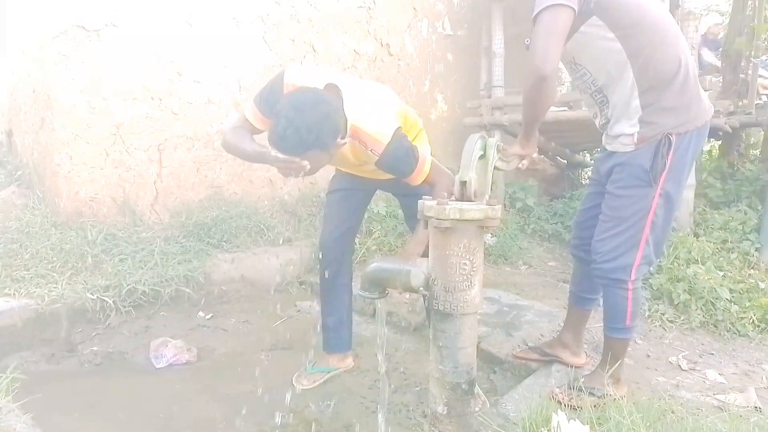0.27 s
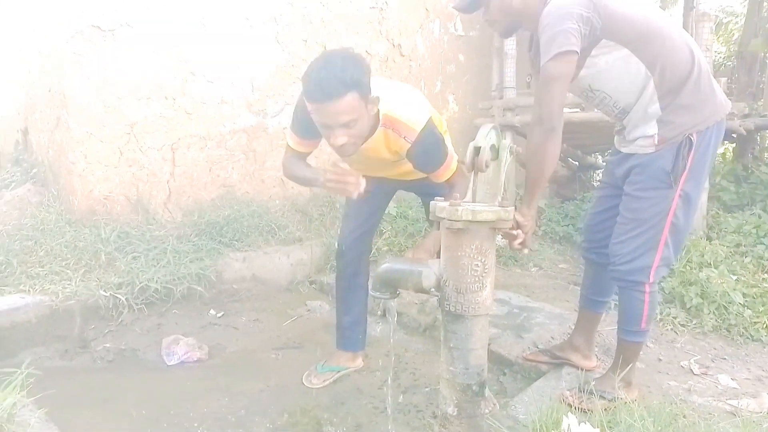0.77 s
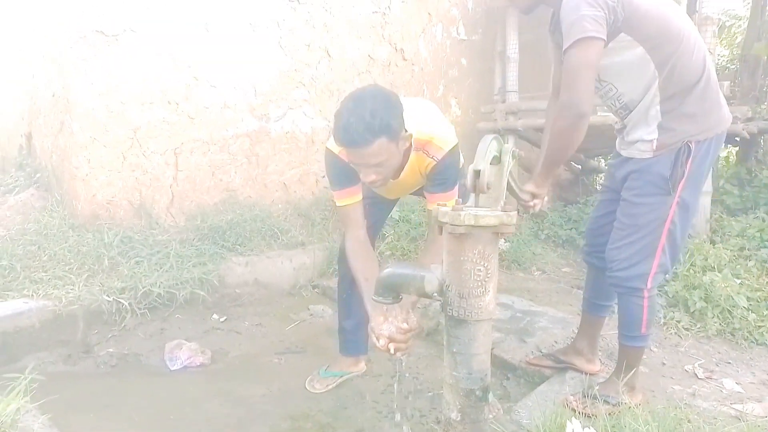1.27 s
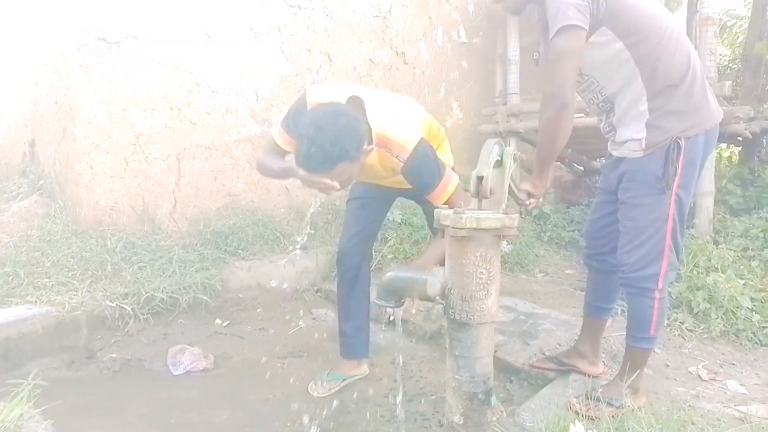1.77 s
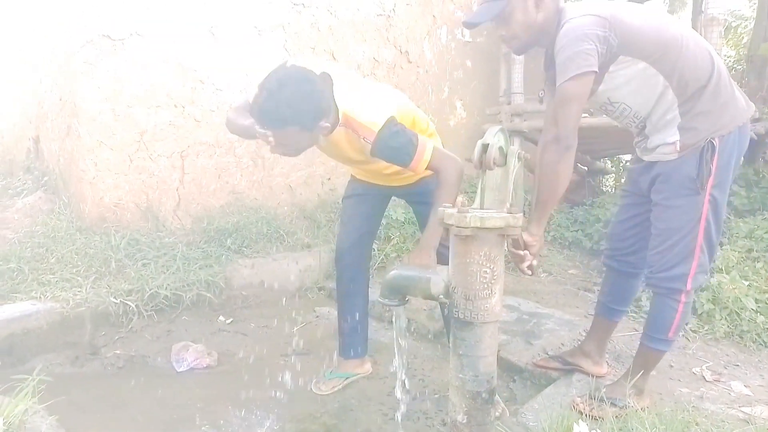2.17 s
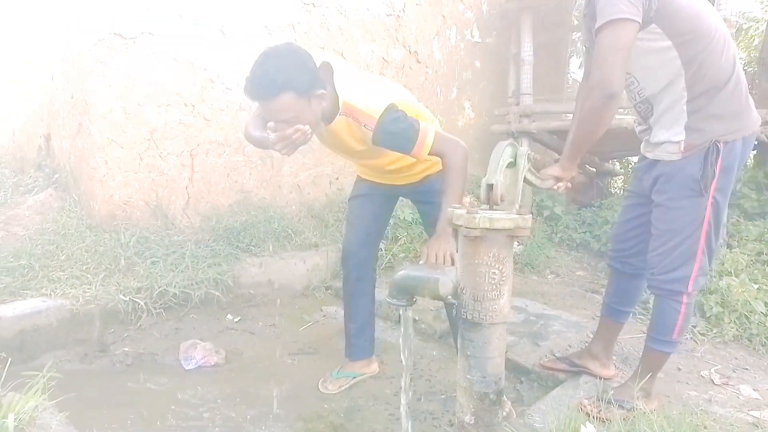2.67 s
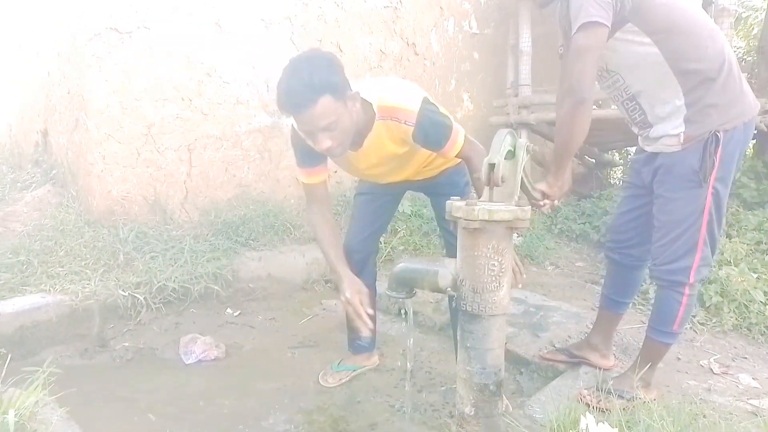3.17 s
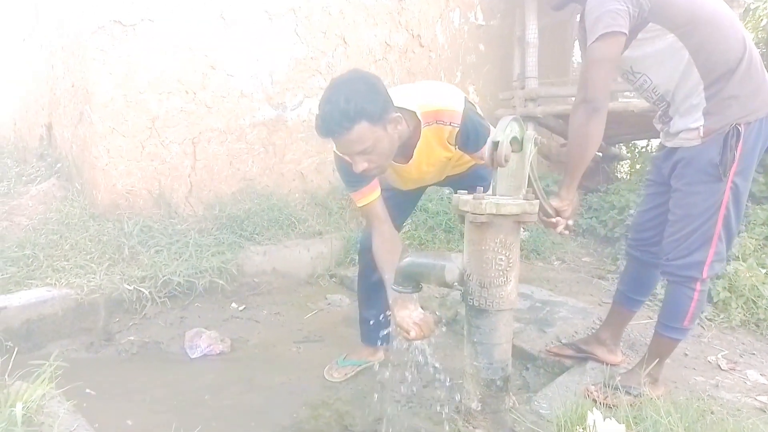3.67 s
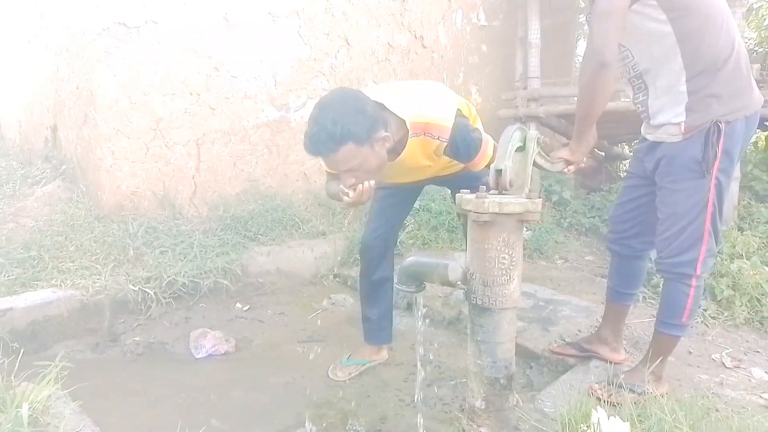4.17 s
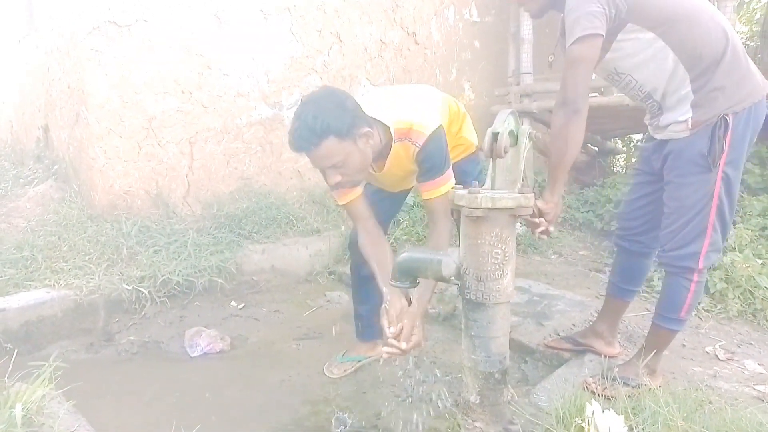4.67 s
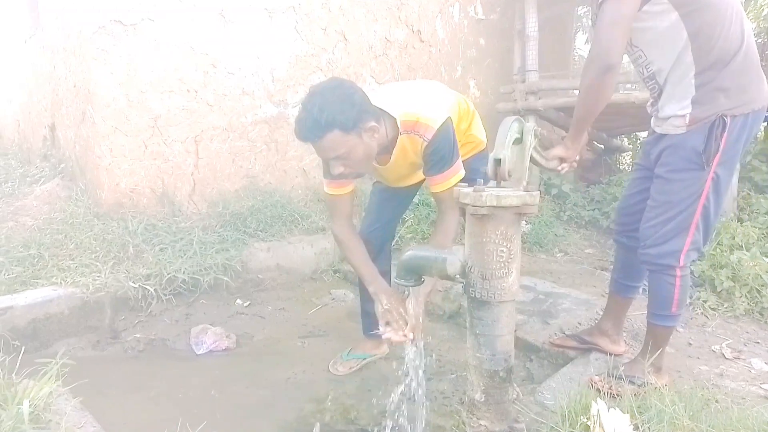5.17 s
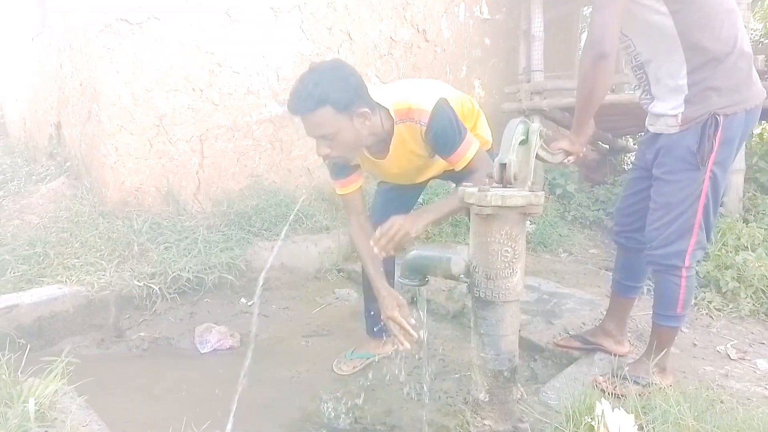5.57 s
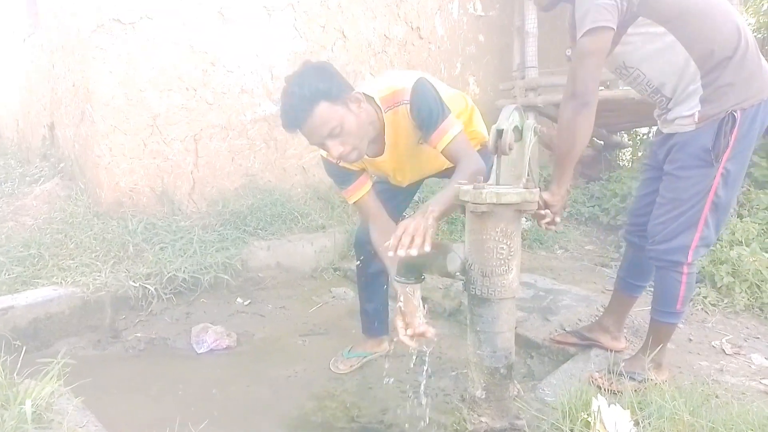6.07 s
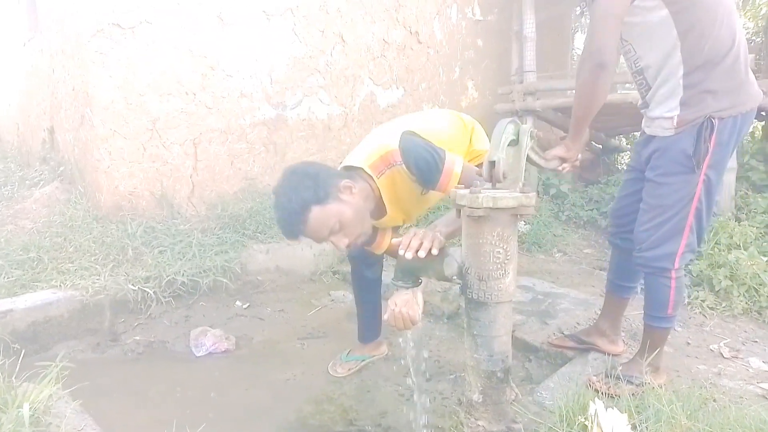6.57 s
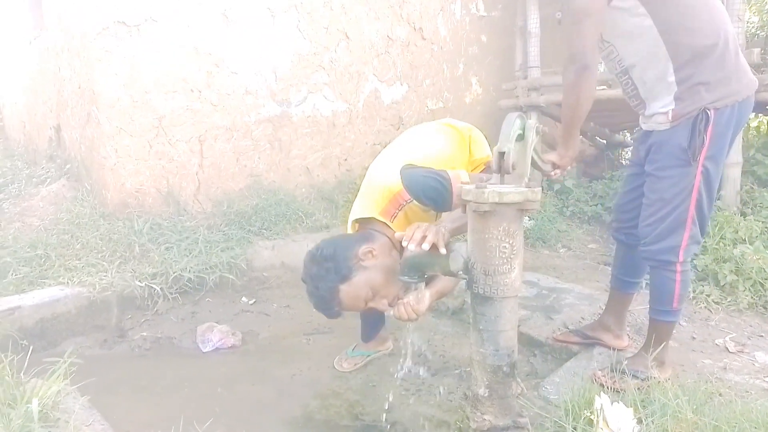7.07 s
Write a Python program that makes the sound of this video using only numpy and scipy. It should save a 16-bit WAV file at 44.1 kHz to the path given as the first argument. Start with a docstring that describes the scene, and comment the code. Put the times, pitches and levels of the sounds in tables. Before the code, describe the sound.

A quiet outdoor yard, heard close in stereo. Water hisses thinly from a hand pump onto stone throughout, uneven and bright. At 0.2 s a handful splashes hard and slaps the ground, with smaller splatters near 0.4, 1.0 and 1.4 s and a pour around 1.5 to 1.8 s. The dry iron pivot gives a faint, very high squeak at 0.65 s, a piercing double chirp at 1.85 to 1.95 s, a barely audible one at 3.35 s, then clear short squeals at 4.55, 5.9 and 7.2 s. Light metallic knocks fall at 3.0, 4.3, 5.65 and 6.9 s. From about 1 s a small motorbike's low putter fades in, quickens, passes nearest around 3.6 s with buzzing panels and tyre whirr, then recedes, its revs rising. The stream is fullest near 3 s; splashes return around 4 s, strongly at 5.1 to 5.7 s and 6.3 to 6.9 s, ending in small watery plinks.

```python
"""Hand pump in a yard with a passing motorbike

The pivot of a cast-iron hand pump squeals by stick-slip, as a gliding note and its octave, and its handle knocks.
Water, made of shaped noise and drop impacts, hisses on stone, splashes off hands, ticks, slaps and plinks.
A single-cylinder motorbike putters past: pops excite exhaust resonances and ringing panels; chain and tyres whirr.
Two microphone ports hear it over quiet air; the water's treble peaks lower at the left one than at the right."""
import sys
import numpy as np
from scipy import signal
from scipy.fft import rfft, irfft, next_fast_len
from scipy.io import wavfile
from scipy.ndimage import uniform_filter1d

SR = 44100
rng = np.random.default_rng(int(sys.argv[2]) if len(sys.argv) > 2 else 0)


def bounce(signal):
    """Save signal as a 16-bit WAV file at the path given by the first command-line argument."""
    frames = np.transpose(np.atleast_2d(signal))
    limited = np.clip(frames, -1, 1)
    pcm = np.round(limited * 32767).astype(np.int16)
    wavfile.write(sys.argv[1], SR, pcm)


N = 323253
T = np.arange(N) / SR

# Coherence of diffuse sound at the two ports: (f/Hz, correlation)
COHERENCE = [(60, 1), (300, 0.99), (700, 0.87), (1300, 0.18), (2400, 0.059)]
# Spectrum of the quiet yard: (f/Hz, relative level/dB)
AIR_SPECTRUM = [(15, -59), (25, -15), (59, 8.5), (168, -11), (300, -2.5), (600, -9.5), (1320, -5.5),
                (1550, -12), (3000, -7), (3900, -8), (6600, -120)]
AIR_DB = -70

# Steady stream from the spout: (t/s, flow level/dB, lower spray re flow/dB, left-right/dB)
STREAM = [(0, -42, -30, -2.5), (.4, -41.5, -13.5, -4), (.66, -44.5, -26, -3.5), (.94, -45, -21.5, -5),
          (1.3, -45, -15, -7), (1.48, -43.5, -16, -9), (1.9, -41, -10.5, -3.5), (2.4, -38.5, -13, -4),
          (3.05, -34.5, -10, -4.5), (3.76, -41.5, -6.5, 1), (4.3, -39.5, -13.5, -2), (4.83, -40, -11, 6.5),
          (5.1, -52, -14, 19), (5.5, -45, -13.5, 15), (6.05, -47, -9, 13.5), (6.3, -49.5, -13.5, 13),
          (6.9, -39, -7.5, 1.5), (7.2, -46.5, -8, 8.5), (7.33, -46, -15, 1)]
# Spectrum of the fine spray: (f/Hz, relative level/dB)
FINE_SPECTRUM = [(3000, -45), (5000, -22), (6800, -2), (7800, 3), (9200, 1), (10700, 3), (12500, -7),
                 (14400, -7.5)]
# Spectrum of the lower spray: (f/Hz, relative level/dB)
LOWER_SPECTRUM = [(300, -37), (900, 0), (1600, -11), (2500, 4), (3500, 3.5), (5200, 8), (7500, -0.5),
                  (10000, -44)]
# Directivity of the two ports for water: (f/Hz, left-right/dB)
PORT_DIFFERENCE = [(1500, 6.5), (2800, 6), (5500, 1), (7600, 11.5), (8600, 2.5), (10500, -8),
                   (13000, -18.5), (14500, -9.5)]
# Water pouring off the hands: (start t/s, hold/s, level/dB, lower spray re fine/dB)
POURS = [(0.001, 0.022, -42, -10.5), (0.165, 0.024, -42.5, 3), (0.996, 0.13, -45.5, -4),
         (1.362, 0.027, -60, 3), (1.514, 0.26, -40.5, -7.5), (2.173, 0.066, -50.5, 0),
         (3.936, 0.094, -47.5, -36), (5.14, 0.21, -38.5, -9.5), (5.605, 0.099, -51.5, -3),
         (6.312, 0.15, -43, -9), (6.516, 0.02, -42, -13), (6.63, 0.12, -43.5, -44)]
POUR_RISE_S, POUR_RELEASE_DB_PER_S = 0.017, 166
HANDS_DB = -2  # left-right dB of all that the hands throw, ahead of the port difference
# Single large drops on stone: (t/s, relative level/dB)
TICKS = [(0.0214, -28), (0.1775, -19), (0.5746, -30), (0.864, -32), (0.905, -32), (0.921, -31),
         (0.9862, -32), (1.2625, -29), (1.486, -32), (1.6071, -28), (1.642, -29), (1.9942, -30),
         (2.1129, -28), (2.2169, -19), (2.4224, -29), (3.0275, -19), (3.731, -30), (3.8779, -27),
         (4.0427, -21), (4.1905, -30), (4.3191, -20), (5.2355, -24), (5.6156, -25), (6.3031, -30),
         (6.3879, -28), (6.4281, -32), (6.4502, -19), (6.5365, -24), (6.6368, -31), (6.6548, -16),
         (6.9177, -21)]
# Splashes off the hands: (t/s, relative level/dB, lower spray re fine/dB, t60/s)
SPLASHES = [(0.177, -11.5, -9, 0.072), (0.375, -25, -2, 0.13), (0.962, -29, -20.5, 0.48),
            (1.055, -27.5, -16, .2), (1.113, -39, 3, 0.071), (1.2615, -35.5, 5.5, 0.057),
            (1.415, -25.5, -7.5, 0.12), (2.033, -32.5, -3, 0.24), (2.105, -28, 0, 0.14),
            (2.2205, -23, -6.5, 0.29), (2.303, -32, -2, 0.41), (2.421, -42, 5.5, 0.3),
            (3.029, -50, 9, 0.082), (3.9497, -24.5, -15.5, 0.42), (4.045, -31, -0.5, 0.25),
            (4.317, -37, 1.5, 0.15), (5.134, -35, -7, 0.032), (5.191, -38, 4, 0.17),
            (5.2355, -22, -21, 0.041), (5.453, -31, -7, 0.064), (5.616, -28, -37, 0.068),
            (5.65, -24.5, -10.5, 0.16), (5.718, -27, -7, 0.13), (6.3135, -31, -33, 0.2),
            (6.3853, -25, -4.5, 0.11), (6.4505, -37, 10, 0.037), (6.546, -29, -1, 0.11),
            (6.862, -32, -7, 0.092), (6.918, -28.5, 0, 0.16)]
# Handfuls of water hitting the ground: (t/s, relative level/dB, t60/s)
SLAPS = [(0.178, -27.5, 0.21), (0.204, -37.5, 0.18), (0.243, -37.5, 0.39), (0.381, -46, 0.12),
         (1.046, -49.5, 0.72), (1.115, -43, 0.22), (1.396, -32.5, 0.16), (1.411, -39, 0.089),
         (5.298, -31, 0.099)]
# Drops that trap a bubble: (t/s, level/dB, f/Hz, t60/s)
PLINKS = [(0.3789, -40, 3320, 0.037), (1.05, -38.5, 1245, 0.025), (1.543, -38.5, 3100, 0.019),
          (1.7995, -33, 3680, .012), (2.356, -40, 2040, 0.043), (2.9884, -52, 3520, .012),
          (3.3524, -36, 2560, .015), (3.4237, -34.5, 2570, 0.014), (3.621, -35, 2330, 0.012),
          (4.057, -35, 2480, 0.034), (4.826, -39, 2200, 0.014), (5.1935, -31, 3030, 0.012),
          (5.2077, -29, 3230, 0.02), (5.2984, -37, 2820, 0.015), (5.367, -32, 3300, 0.013),
          (5.7844, -39, 3190, 0.0097), (6.304, -32, 3500, 0.0096), (6.721, -47, 2460, 0.029),
          (6.8627, -32, 3600, 0.0078), (7.0042, -28, 3950, 0.0066), (7.0486, -31.5, 3100, 0.0089),
          (7.1766, -32, 3830, 0.007), (7.195, -40, 3300, 0.013)]
CHIRPS_PER_S, CHIRPS_DB = 500, -9  # small bubbles; level against the lower spray's noise

# Squeals of the pivot: (full voice t/s, first f/Hz, last f/Hz,
#   note level/dB, note left-right/dB, note hold/s, note release/(dB/s),
#   left port's phase lead first/rad, last/rad,
#   octave level/dB, octave left-right first/dB, last/dB, octave peak after full voice/s, octave hold/s)
SQUEALS = [(0.656, 6052, 6052, -54, 6, .08, 500, .4, .4, -36, -19, -12, .002, .006),
           (1.836, 6590, 6570, -30, 0, .005, 1000, .4, .4, -60, -12, -12, .002, .004),
           (1.859, 6075, 5985, -10, 5, .003, 1700, .4, .4, -11, -20, -7, .04, .054),
           (1.948, 6005, 5955, -8.5, 5, .036, 340, .8, 2.0, -21, -18, -24, .02, .056),
           (3.358, 6048, 6040, -33, 0, .01, 900, .4, .4, -51, -16, -16, .002, .015),
           (4.551, 5985, 6008, -12, 8, .036, 1000, .7, -.1, -18, -20, -8, .004, .065),
           (5.903, 6020, 5985, -14, 11, .08, 1000, .8, .4, -13, -14, -6, .026, .096),
           (7.235, 6064, 6000, -12, 10, .11, 1000, -.3, 3.0, -11, -1, -9, .047, .11)]
OCTAVE_LEAD = -2.18  # radians by which the left port leads the octave
QUIET_DB, RISE_S, SAG_DB_PER_S = -92, 0.0259, 94  # the note grows out of silence, then sags while it holds
SWELL_DB_PER_S, FADE_DB_PER_S, LET_GO_DB_PER_S = 332, 173, 900  # the octave swells to its peak, fades, lets go
RING_DB, OCTAVE_RING_DB, RING_DB_PER_S = -27, -13.5, 325  # the iron rings on faintly once a squeal lets go
OVERSHOOT_HZ, SETTLE_S = 30, .01  # a squeal starts sharp and settles

# Engine speed: (t/s, firing rate f/Hz)
FIRING = [(1.05, 14.18), (1.8, 13.04), (2.2, 14.25), (2.5, 13.46), (2.8, 15.85), (3.1, 19.4), (3.4, 20.21),
          (3.9, 19.98), (4.3, 18.77), (4.6, 17.3), (5.0, 18.27), (5.5, 19.31), (6.0, 20.63), (6.4, 21.59),
          (6.9, 22.87), (7.33, 24.22)]
FIRST_TURN = -.34  # part of a cycle before the first firing
# Exhaust resonances: (t/s, boom f/Hz, boom swell/dB, bark f/Hz, narrow core level/dB, wide skirt level/dB)
EXHAUST = [(1.05, 119, -8, 219, 4, -8), (1.45, 141, 1, 264, 4, 2), (1.8, 124, 2.5, 244, 9, -12),
           (2.3, 107, 1, 260, 0.5, -2.5), (2.7, 84, 2.5, 269, -8, 5.5), (3.1, 93, 2.5, 315, 5.5, -5),
           (4, 103, -2, 321, -1.5, -9), (4.6, 91, 4.5, 301, -3, -1.5), (5.3, 90, 6, 285, -34, 4),
           (5.9, 96, -2, 267, -18, 2.5), (6.4, 105, 0, 268, -12, 5.5), (6.8, 117, 5, 296, -33, 3),
           (7.33, 122, -6, 290, -14, 1)]
# Steady exhaust modes: (f/Hz, width/Hz, level/dB)
PIPE_MODES = [(200, 20, -2), (250, 35, -2), (390, 80, -14)]
# Ringing panels: (first f/Hz, last f/Hz, width/Hz, lag after the pop first/s, last/s,
#   start t/s, end t/s, level at the nearest point while ringing/dB, level there otherwise/dB)
PANELS = [(600, 615, 18, -.012, .028, 1.93, 2.94, -43, -56),
          (754, 732, 13, .025, .025, 3.8, 4.72, -42, -54), (760, 740, 20, .025, .025, 3.2, 3.8, -54, -70),
          (790, 860, 60, .01, .01, 3.17, 3.6, -46, -66), (922, 922, 22, .01, .01, 3.3, 3.98, -52, -70),
          (900, 900, 90, 0, 0, 6.45, 6.9, -39, -70)]
PANEL_EDGE_S, PANEL_FADE_S, RATTLE = .06, .1, .3  # rattle: weight of noise beside the pops in the drive
PANEL_TURN_DB_PER_S = 6  # panels face away once the bike has passed
PASS_S, NEAREST_M, SPEED_M_PER_S = 3.648, 5.52, 11  # the motorbike's straight path
# layers: (relative dB when nearest, share of the distance loss, drift dB/s)
BOOM, BARK, WHIRR = (-54, 0.97, -1.35), (-42.5, 1.38, -0.32), (-43, 1, -0.37)
PORT_GAP_S, ABREAST_S = .00033, 3.75  # sound's time between the ports; when the bike is equally far from both
NEAR_ECHO, FAR_ECHO, HUM, ROAR = 0.55, 1, 0.12, 0.08  # weights in the drive of the exhaust

# The handle meets its stop: (t/s, relative level/dB)
KNOCKS = [(3.03, -29.5), (4.321, -35.5), (5.65, -35.5), (6.919, -33.5)]
# Modes of the handle: (f/Hz, level/dB, t60/s)
HANDLE_MODES = [(3300, -15.5, 0.036), (4440, 0, 0.049), (5200, -4, 0.034), (6400, -7.5, 0.043)]
EDGE_HZ = 14450  # upper band limit


def gain_of(db):
    """Level: an amplitude ratio is ten to the power of dB/20."""
    return 10 ** (np.asarray(db) / 20)


def evened(x):
    """Normalisation: division by the root mean square gives rms 1."""
    return x / np.sqrt(np.mean(x ** 2) + 1e-20)


def read(points, hz):
    """Interpolation: a spectrum is read linearly on a log-frequency axis."""
    f, value = np.transpose(points)
    return np.interp(np.log(hz + 1), np.log(f + 1), value)


def curves(rows, t=T):
    """Interpolation: a table's columns become straight lines in time."""
    s, *columns = np.transpose(rows)
    return [np.interp(t, s, c) for c in columns]


def after(s, length):
    """Elapsed time: the samples from s on, and their ages in seconds."""
    span = slice(round(s * SR), min(round((s + length) * SR), N))
    return span, T[span] - T[span][0]


def sides(db):
    """Interaural-style level difference: half the dB goes to the left gain, minus half to the right."""
    return gain_of(np.array([db / 2, -db / 2]))


def colour(x, points):
    """Linear filtering: the spectrum is multiplied by a gain given in dB."""
    size = next_fast_len(N)
    gain = gain_of(read(points, np.fft.rfftfreq(size, 1 / SR)))
    return irfft(rfft(x, size) * gain, size)[..., :N]


def resonate(x, hz, width):
    """Resonance by heterodyne: hz is shifted down to zero, smoothed and shifted back, with gain 1."""
    turn = np.exp(2j * np.pi * np.cumsum(hz * np.ones(N)) / SR)
    r = np.exp(-np.pi * width / SR)
    return 2 * (turn * signal.lfilter([1 - r], [1, -r], x / turn)).real


def hiss(points, same, patchy_db, flicker_db):
    """Partial coherence: two-port noise of rms 1, with drifting patches and a flicker over all frequencies."""
    frames, hz = N // 128 + 5, np.fft.rfftfreq(512, 1 / SR)
    a, b, c, d, patches = rng.standard_normal((frames, 257, 5)).T
    patches = uniform_filter1d(patches, size=8, axis=0)
    patches = evened(uniform_filter1d(patches, size=14, axis=1))
    flicker = evened(uniform_filter1d(rng.standard_normal(frames), size=3))
    same = np.clip(read(same, hz), -1, 1)[:, None]
    left = a + 1j * b
    right = same * left + np.sqrt(1 - same ** 2) * (c + 1j * d)
    level_db = read(points, hz)[:, None] + patchy_db * patches + flicker_db * flicker
    z = np.array([left, right]) * gain_of(level_db)
    return evened(signal.istft(z, nperseg=512, noverlap=384)[1][:, :N])


def droplets(per_s, spread_db, t60):
    """Shot process: the envelope of random drops, sudden, of uneven size, each decaying exponentially."""
    size = gain_of(spread_db * np.minimum(rng.exponential(1, N), 4)) * (rng.random(N) < per_s / SR)
    decay = gain_of(-60 / (t60 * SR))
    return evened(uniform_filter1d(signal.lfilter([1], [1, -decay], size), size=60))


def still_air():
    """Diffuse field: faint noise whose ports agree in the bass and differ in the treble."""
    return gain_of(AIR_DB) * hiss(AIR_SPECTRUM, COHERENCE, patchy_db=2.0, flicker_db=.8)


def water():
    """Superposition of impacts: noise follows the flow and the splashes; drops tick, plink and slap."""
    apart = [(100, 0.011), (15000, 0)]  # spray is nearly unrelated at the two ports
    hands = sides(HANDS_DB)[:, None]
    flow_db, full_db, pan_db = curves(STREAM)
    pour_fine, pour_lower = pours()
    tick_fine, clicks = ticks()
    splash_fine, splash_lower = splashes()

    fine = gain_of(flow_db) * sides(pan_db) + pour_fine * hands
    fine *= 0.5 + 0.19 * droplets(per_s=60, spread_db=4.5, t60=0.055)
    fine += (splash_fine + tick_fine) * hands
    lower = gain_of(flow_db + full_db) * sides(pan_db) + pour_lower * hands
    lower *= 0.46 + 0.32 * droplets(per_s=82, spread_db=4.0, t60=0.09)
    lower += splash_lower * hands

    spray = fine * hiss(FINE_SPECTRUM, apart, patchy_db=1.2, flicker_db=1.6)
    lower_noise = hiss(LOWER_SPECTRUM, apart, patchy_db=3.0, flicker_db=1.2)
    spray += lower * (lower_noise + gain_of(CHIRPS_DB) * chirps())
    spray += (clicks + plinks()) * hands
    ports = [colour(port, [(f, sign * db / 2) for f, db in PORT_DIFFERENCE])
             for port, sign in zip(spray, (1, -1))]
    return np.array(ports) + slaps()


def chirps():
    """Bubble resonance: small bubbles of many sizes, a few decaying cycles each, rising in pitch."""
    size = gain_of(2.37 * np.minimum(rng.exponential(1, N), 4)) * (rng.random(N) < CHIRPS_PER_S / SR)
    kind, out = rng.integers(0, 24, N), np.zeros((2, N))
    for k, hz in enumerate(np.geomspace(2300, 6000, 24)):
        turns = hz * np.arange(400) / SR
        bubble = np.sin(2 * np.pi * turns * (1 + 0.0037 * turns))
        bubble *= np.exp(-turns / 2.4) * np.minimum(turns, 1)
        out[k % 2] += signal.oaconvolve(size * (kind == k), bubble)[:N]
    return evened(out + 0.069 * out[::-1])


def pours():
    """Sustained flow: envelopes of fine and lower spray rise, hold and decay exponentially."""
    fine, lower = np.zeros((2, N))
    for s, hold, db, lower_db in POURS:
        span, age = after(s, .6)
        release_db = POUR_RELEASE_DB_PER_S * np.maximum(age - POUR_RISE_S - hold, 0)
        shape = gain_of(db - release_db) * np.minimum(age / POUR_RISE_S, 1)
        fine[span] += shape
        lower[span] += shape * gain_of(lower_db)
    return fine, lower


def ticks():
    """Impact: a large drop gives a high-passed impulse and a short burst of fine spray."""
    fine, clicks = np.zeros((2, N))
    for s, db in TICKS:
        span, age = after(s, .03)
        fine[span] += gain_of(db - 7 - 60 * age / .018)
        clicks[span.start + 10] += gain_of(db - 17.0)
    return fine, signal.sosfilt(signal.butter(4, 2600, "high", fs=SR, output="sos"), clicks)


def splashes():
    """Clustered impacts: a splash lands as many drops under one exponential decay."""
    fine, lower = np.zeros((2, N))
    spatter = .5 + .5 * droplets(per_s=600, spread_db=3.8, t60=.005)
    for s, db, lower_db, t60 in SPLASHES:
        span, age = after(s, .25)
        shape = gain_of(db - 13.0 - 60 * age / t60) * np.minimum(age / 0.0018, 1) * spatter[span]
        fine[span] += shape
        lower[span] += shape * gain_of(lower_db)
    return fine, lower


def slaps():
    """Broad impact: a mass of water on the ground gives a sudden, decaying burst of low noise."""
    envelope = np.zeros(N)
    for s, db, t60 in SLAPS:
        span, age = after(s, .5)
        envelope[span] += gain_of(db - 3.0 - 60 * age / t60) * np.minimum(age / .0007, 1)
    thud = [(150, -41), (350, -6.0), (600, -12.5), (800, 1.0), (1000, -4.5), (1300, -4.5),
            (2400, -8.0), (4000, -11.5)]  # (f/Hz, relative level/dB)
    return envelope * hiss(thud, [(300, .8), (2000, .3)], patchy_db=2.5, flicker_db=2.5)


def plinks():
    """Bubble resonance: trapped air rings as a decaying sine that builds up over three cycles."""
    out = np.zeros(N)
    for s, db, hz, t60 in PLINKS:
        span, age = after(s, .05)
        envelope = gain_of(db - 60 * age / t60) * np.minimum(hz * age / 3, 1)
        out[span] += envelope * np.sin(2 * np.pi * hz * age)
    return out


def squeals():
    """Stick-slip friction at a mode of the iron: a note and its octave, aimed at different ports."""
    out = np.zeros((2, N))
    lowpass = signal.butter(4, 90, fs=SR, output="sos")
    left_only = np.array([[1], [0]])
    for (s, hz0, hz1, db, pan_db, hold, release, lead0, lead1,
         top_db, pan0_db, pan1_db, peak, top_hold) in SQUEALS:
        span, age = after(s - RISE_S, .25)
        age = age - RISE_S  # zero at full voice
        gone = np.clip(age / max(hold, top_hold), 0, 1)
        hz = hz0 + (hz1 - hz0) * gone ** .7
        hz += OVERSHOOT_HZ * np.exp(-np.maximum(age + .005, 0) / SETTLE_S)

        rise = (db - QUIET_DB) / RISE_S * np.minimum(age, 0)
        past, top_past = np.maximum(age - hold, 0), np.maximum(age - top_hold, 0)
        note_db = db + rise - SAG_DB_PER_S * np.clip(age, 0, hold) - release * past
        note_db = np.maximum(note_db, db + rise + RING_DB - RING_DB_PER_S * past)
        octave_db = top_db + 2 * rise - SWELL_DB_PER_S * np.maximum(peak - age, 0)
        octave_db -= FADE_DB_PER_S * np.clip(age - peak, 0, top_hold - peak)
        octave_db -= LET_GO_DB_PER_S * top_past
        octave_db = np.maximum(octave_db, top_db + 2 * rise + OCTAVE_RING_DB - RING_DB_PER_S * top_past)
        note_db, octave_db = uniform_filter1d(np.array([note_db, octave_db]), size=90, axis=1)

        waver = evened(signal.sosfilt(lowpass, rng.standard_normal((2, len(hz)))))
        phase = 2 * np.pi * np.cumsum(hz) / SR
        lead = left_only * (lead0 + (lead1 - lead0) * gone)
        note = gain_of(note_db + .5 * waver[::-1]) * np.sin(phase + lead + .1 * waver)
        # a mode near 12 kHz holds the octave down
        high = 4 * np.pi * np.cumsum(np.minimum(hz, 6055)) / SR
        octave = np.sin(high + left_only * OCTAVE_LEAD + .3 * waver)
        octave *= gain_of(octave_db + 1.2 * waver[::-1])

        both = note * sides(pan_db)[:, None] + octave * sides(pan0_db + (pan1_db - pan0_db) * gone)
        out[:, span] += np.sqrt(2) * both * np.minimum(np.arange(len(hz)) / 100, 1)
    return out


def yard(x):
    """Reflection: walls throw back sparse echoes of either sign that decay exponentially."""
    t = np.arange(SR // 2) / SR
    taps = rng.choice([-1., 1.], (2, len(t))) * (rng.random((2, len(t))) < .05)
    taps *= (t > .012) * gain_of(-60 * t / .25)
    return signal.fftconvolve(x, taps / np.linalg.norm(taps[0]), axes=1)[:, :N]


def motorbike():
    """Moving source: exhaust, panels and whirr follow the distance law and an arrival lag at the ports."""
    turns = FIRST_TURN + np.cumsum(curves(FIRING)[0] * (T > FIRING[0][0])) / SR
    pops = np.r_[0, np.diff(np.floor(turns))] * gain_of(rng.standard_normal(N))  # one a firing
    noise = hiss([(20, 0), (20000, 0)], COHERENCE, patchy_db=1.5, flicker_db=1.2)
    loss_db = -20 * np.log10(np.hypot(1, SPEED_M_PER_S * (T - PASS_S) / NEAREST_M))
    boom_db, bark_db, whirr_db = (db + share * loss_db + drift * (T - PASS_S)
                                  for db, share, drift in (BOOM, BARK, WHIRR))
    sound = exhaust(exhaust_drive(turns, pops, noise), boom_db, bark_db)
    sound += panels(turns % 1, pops, noise, loss_db)
    sound += gain_of(whirr_db) * whirr(noise)
    along_m = SPEED_M_PER_S * (T - ABREAST_S)
    lag = PORT_GAP_S * along_m / np.hypot(along_m, NEAREST_M)  # the nearer port hears it first
    sound[0] = np.interp(T - lag, T, sound[0])
    return sound * np.clip((T - 1.0) / .16, 0, 1) * sides(.5)[:, None]


def exhaust_drive(turns, pops, noise):
    """Periodic excitation: pops, their echoes, hums at single orders and a little gas roar."""
    echoes = yard(pops[None])  # they fill the gaps between pops
    echoes = evened(echoes[:1] + .8 * echoes)
    far = np.interp(T, [5, 6.6], [NEAR_ECHO, FAR_ECHO])  # echoes and hums gain as the bike rides off
    return evened(pops) + .5 * far * echoes + HUM * far ** 2 * hums(turns) + ROAR * noise


def hums(turns):
    """Harmonic series: multiples 3 to 24 of the firing rate, each swelling and sinking slowly by itself."""
    count = 22
    knots = rng.standard_normal((9, count))  # dB
    start = rng.random(count)
    out = np.zeros(N)
    for k in range(count):
        swell_db = np.interp(T, np.linspace(0, T[-1], len(knots)), knots[:, k])
        out += gain_of(swell_db) * np.cos(2 * np.pi * ((k + 3) * turns + start[k]))
    return evened(out)


def exhaust(drive, boom_db, bark_db):
    """Forced resonance: the drive rings the exhaust in two ranges, a low boom and a higher bark."""
    boom_hz, swell_db, bark_hz, core_db, skirt_db = curves(EXHAUST)
    boom = resonate(drive, boom_hz, 36.5) + 1.33 * resonate(drive, 140, 25)
    boom = resonate(boom, .5 * boom_hz + 55, 132)
    boom = signal.sosfilt(signal.butter(2, 68, "high", fs=SR, output="sos"), boom)

    # alternate signs between neighbouring modes
    pipe = sum((-1) ** k * gain_of(db) * resonate(drive, f, w) for k, (f, w, db) in enumerate(PIPE_MODES))
    body = gain_of(core_db) * resonate(drive, bark_hz, 23.0)
    body += gain_of(skirt_db) * resonate(drive, bark_hz, 105)
    bark = resonate(body + pipe + .12 * resonate(drive, 435, 450), .5 * bark_hz + 125, 200)
    bark = signal.sosfilt(signal.butter(2, 480, fs=SR, output="sos"), bark)

    sound = gain_of(boom_db + swell_db) * evened(boom) + gain_of(bark_db) * evened(bark)
    # a gap opens between the two ranges
    return sound - np.interp(T, [2, 3.2], [.4, .85]) * resonate(sound, 154, 32)


def panels(cycle, pops, noise, loss_db):
    """Sympathetic resonance: pops and rattle shake panels, each ringing for a while at its own pitch."""
    shake = noise * (.3 + np.exp(-((cycle - .15) / .16) ** 2))  # hardest a little after the pop
    shake = RATTLE * evened(shake) + evened(pops)
    out = np.zeros((2, N))
    for hz0, hz1, width, lag0, lag1, start, end, ring_db, idle_db in PANELS:
        ringing = np.minimum((T - start) / PANEL_EDGE_S, (end - T) / PANEL_FADE_S)
        ringing = np.clip(ringing + .5, 0, 1)
        hz = np.interp(T, [start, end], [hz0, hz1])
        db = loss_db - PANEL_TURN_DB_PER_S * np.maximum(T - PASS_S, 0)
        db += idle_db + (ring_db - idle_db) * ringing
        late = T - np.interp(T, [start, end], [lag0, lag1])
        delayed = [np.interp(late, T, port) for port in shake]
        out += gain_of(db) * evened(resonate(resonate(delayed, hz, width), hz, 70))
    return out


def whirr(noise):
    """Broad resonance: the noise of chain and tyres through two wide bands."""
    return evened(resonate(resonate(noise, 680, 600), 850, 1200))


def knocks():
    """Modal impact: the handle strikes its stop and the iron's modes decay as sines."""
    out = np.zeros(N)
    for s, db in KNOCKS:
        span, age = after(s, .08)
        for hz, mode_db, t60 in HANDLE_MODES:
            out[span] += gain_of(db + mode_db - 60 * age / t60) * np.sin(2 * np.pi * hz * age)
    return out * sides(3.0)[:, None]


def scene():
    """Superposition: air, water, pump with its faint echoes, and motorbike add linearly."""
    pump = squeals() + knocks()
    return still_air() + water() + pump + gain_of(-30) * yard(pump) + motorbike()


def record(dry):
    """Band limitation: the microphones lose the deepest bass, and the treble ends at EDGE_HZ."""
    thin = signal.sosfilt(signal.butter(3, 62, "high", fs=SR, output="sos"), dry)
    lowpass = signal.firwin(301, EDGE_HZ, window=("kaiser", 9), fs=SR)
    return signal.oaconvolve(thin, lowpass[None], "same")


dry = scene()
out = record(dry)
bounce(out)
```